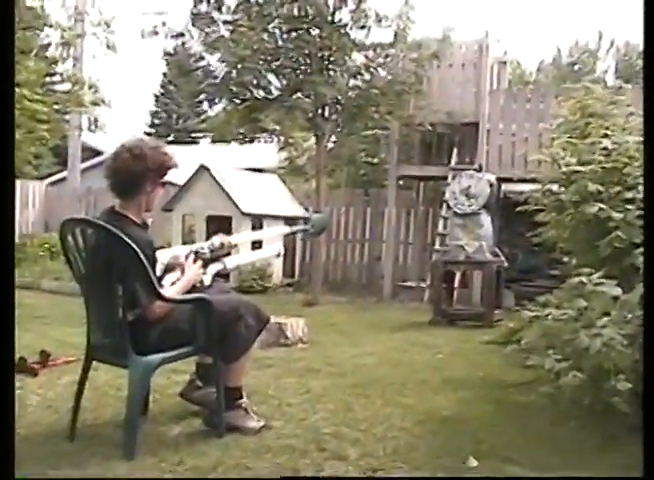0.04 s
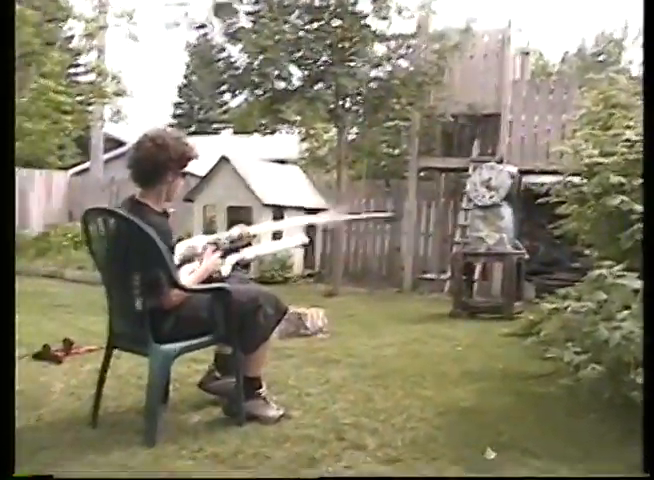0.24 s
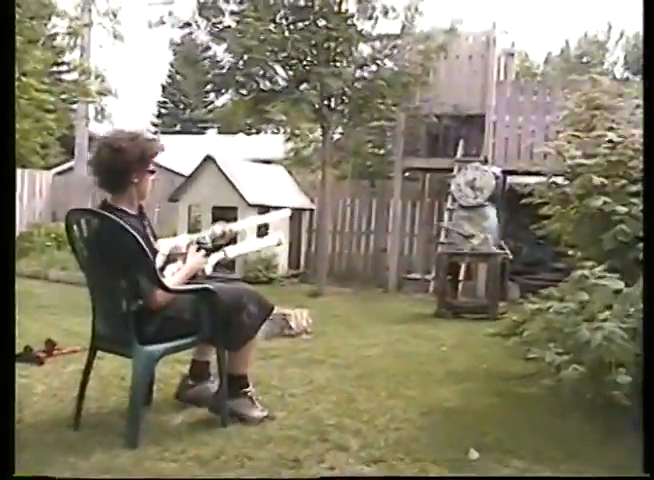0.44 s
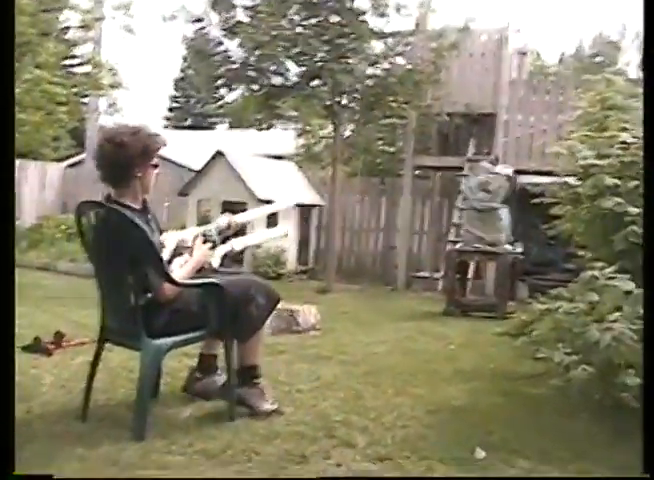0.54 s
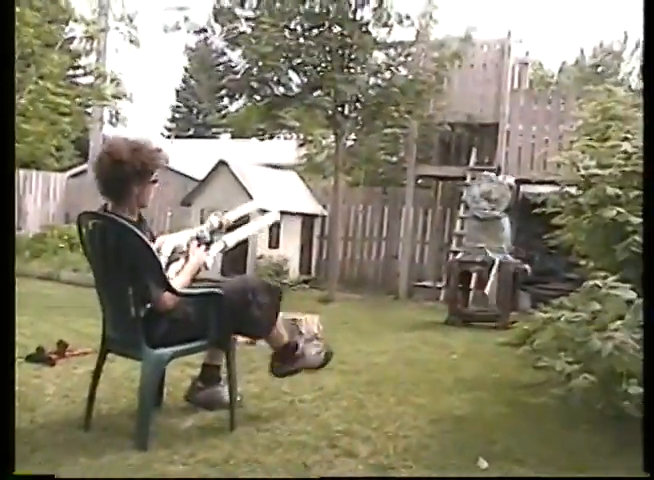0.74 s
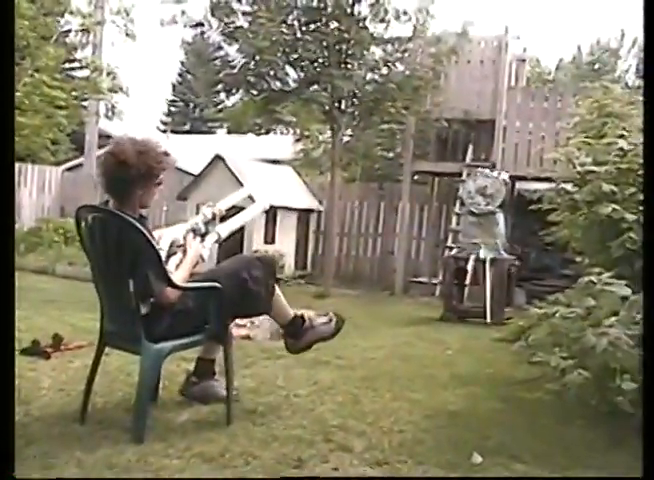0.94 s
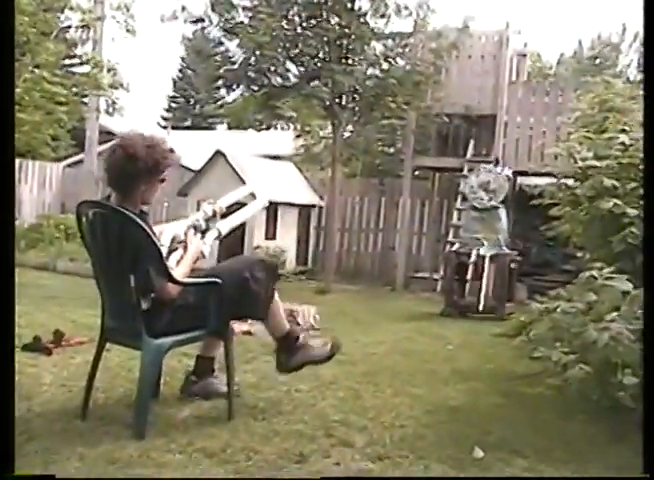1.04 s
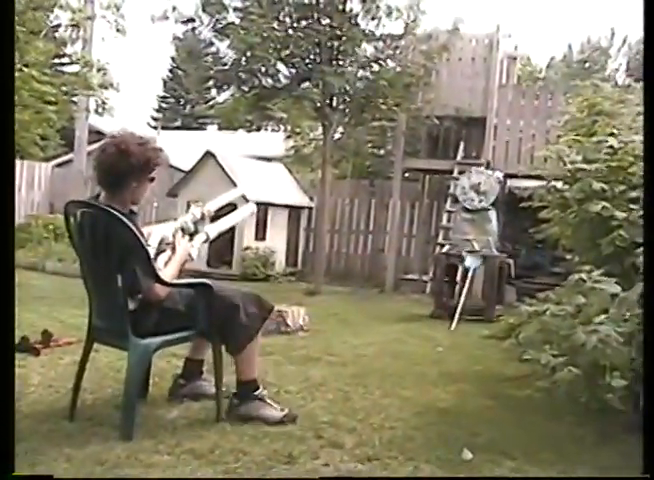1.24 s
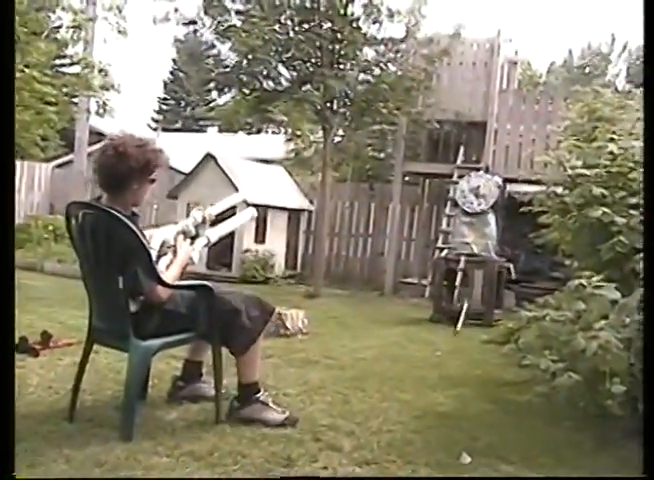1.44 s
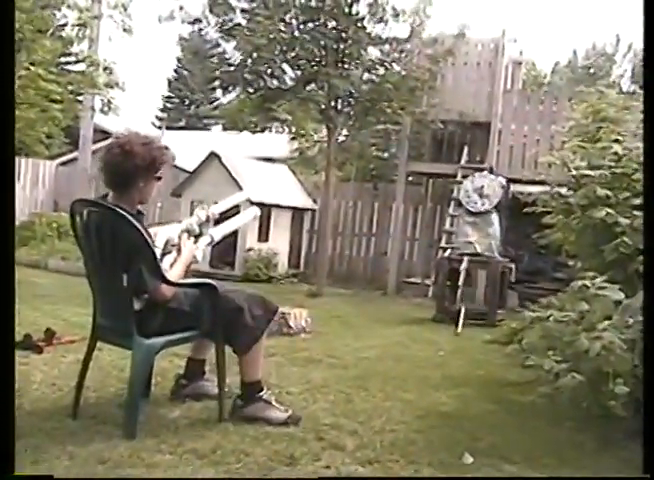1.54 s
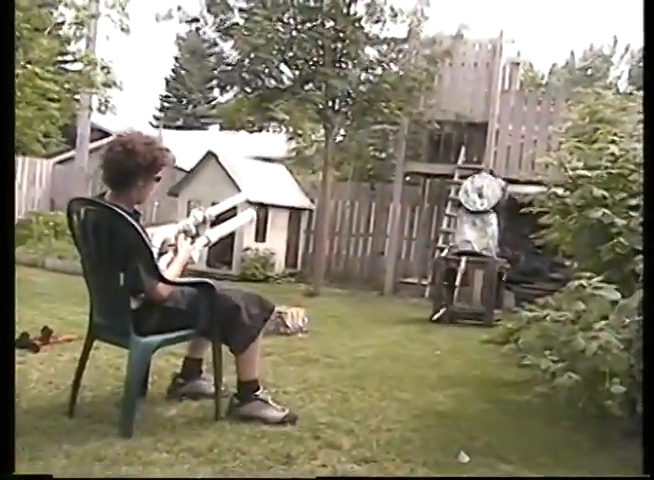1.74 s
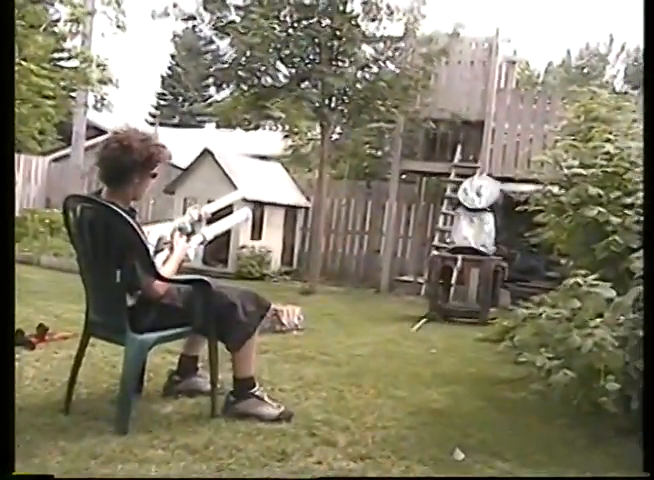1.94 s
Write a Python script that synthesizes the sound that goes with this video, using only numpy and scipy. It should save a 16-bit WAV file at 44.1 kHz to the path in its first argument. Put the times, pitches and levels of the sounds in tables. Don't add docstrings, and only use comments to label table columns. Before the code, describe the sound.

Compressed-air cannon fires with a click, pop and harsh rush, then slams into rattling sheet metal

```python
import sys
import numpy as np
from scipy import signal
from scipy.fft import rfft, irfft
from scipy.io import wavfile
from scipy.ndimage import uniform_filter1d

SR = 44100
rng = np.random.default_rng(int(sys.argv[2]) if len(sys.argv) > 2 else 0)


def amplitude_ratio(level_db):
    exponent = np.asarray(level_db, float) / 20
    return 10 ** exponent


def master_out(mix):
    frames = np.transpose(np.atleast_2d(mix))
    ceiling = np.clip(frames, -1, 1)
    pcm = np.round(ceiling * 32767).astype(np.int16)
    wavfile.write(sys.argv[1], SR, pcm)


N = 88200

LINE_HZ = 15734.2
# start_s, level_db
SHAKING = [(.558, -23), (.595, -16), (.645, -20), (.71, -27.5), (.79, -38), (.87, -45), (1.0, -42.5),
           (1.15, -48.5), (1.3, -50), (1.41, -65.5)]


def read(points, hz):
    table_hz, value = np.transpose(points)
    return np.interp(np.log(hz + 1), np.log(table_hz + 1), value)


def evened(x):
    return x / np.sqrt(np.mean(x ** 2) + 1e-20)


def colour(x, points):
    gain = amplitude_ratio(read(points, np.fft.rfftfreq(len(x), 1 / SR)))
    return evened(irfft(rfft(x) * gain, len(x)))


def band(x, hz, width):
    sharpness = max(hz / min(width, SR * .4), .2)
    return signal.lfilter(*signal.iirpeak(min(hz, SR * .45), sharpness, SR), x)


def lumpy(x, depth_db):
    spectrum = rfft(x)
    smoothing = max(int(40.1 * len(x) / SR), 2)
    lumps = evened(uniform_filter1d(rng.standard_normal(len(spectrum)), smoothing))
    return evened(irfft(spectrum * amplitude_ratio(depth_db * lumps), len(x)))


def level(curve):
    s, db = np.transpose(curve)
    t = np.arange(N) / SR
    db = np.interp(t, s, db) - 150 * np.maximum(t - s[-1], 0)
    return amplitude_ratio(db) * (t >= s[0]), db


def add(mix, s, sound):
    part = mix[round(s * SR):][:len(sound)]
    part += sound[:len(part)]


def ring(modes, upper_db=0, rise=0.00099, start=0):
    t = np.arange(SR) / SR
    upper_from_hz = modes[0][0] * 1.5
    out = np.zeros(SR)
    for hz, db, t60 in modes:
        fade = amplitude_ratio(db + upper_db * (hz > upper_from_hz) - 60 * t / t60)
        out += fade * np.sin(2 * np.pi * hz * (t + start))
    return (1 - np.exp(-t / rise)) * out


def choke(after_s):
    return np.maximum(np.arange(SR) / SR - after_s, 0)


def yard():
    # pitch_hz, level_db per Hz
    air = [(15, -59), (25, 4), (118, 1), (1980, -10), (3150, -17.5), (5420, -10), (8600, -18.5),
           (15200, -21), (16500, -46)]
    swell = amplitude_ratio(0.5 * evened(uniform_filter1d(rng.standard_normal(N), 4000)))
    return amplitude_ratio(-56.5) * swell * colour(rng.standard_normal(N), air)


def whine():
    return amplitude_ratio(-57.5) * np.sin(2 * np.pi * LINE_HZ * np.arange(N) / SR)


def idle():
    t = np.arange(N) / SR
    field_hz = 59.94
    buzz = sum(np.sinc(k / 24.0) * np.cos(2 * np.pi * k * field_hz * t) for k in range(1, 56))
    hiss = amplitude_ratio(-79) * rng.standard_normal(N)
    whistles = amplitude_ratio(-90) * np.sin(2 * np.pi * LINE_HZ * t) + amplitude_ratio(-86) * np.sin(2 * np.pi * 8000 * t)
    return hiss + amplitude_ratio(-83) * evened(buzz) + whistles


def knocks():
    # start_s, peak_db, pitch_hz, fade_s (time to fall 60
    # dB), width as a share of pitch
    knock_bursts = [(.1868, -10.5, 6230, 0.0068, 0.88), (.2375, -8.5, 6400, 0.044, 0.24),
                    (.5578, -5.5, 11600, 0.015, 2.2), (.666, -15, 6950, 0.033, 0.72),
                    (.7305, -17.5, 2530, 0.051, 0.67), (.835, -36.5, 7400, 0.051, 0.29),
                    (.843, -26, 1470, 0.098, 0.39), (.958, -36.5, 4600, 0.04, 0.5),
                    (.9815, -31, 8150, 0.024, 0.34), (.982, -29, 2180, 0.037, 0.53),
                    (1.009, -31, 4200, 0.027, 0.9), (1.0265, -30.5, 4040, 0.032, 1),
                    (1.078, -39, 5370, 0.021, 0.38), (1.13, -47, 5330, 0.15, 0.64),
                    (1.2185, -34, 1980, 0.037, 1.6), (1.276, -39.5, 5000, 0.089, 0.77),
                    (1.29, -36.5, 4570, 0.047, 1), (1.488, -44, 5830, .02, 0.28),
                    (1.5088, -24.5, 5050, 0.012, 1.1), (1.54, -36, 5130, 0.026, 0.43),
                    (1.7135, -26, 5100, 0.013, 0.37), (1.772, -39, 4930, 0.013, 0.44),
                    (1.8935, -26.5, 4100, 0.0087, 0.77), (1.9095, -35.5, 5530, 0.025, 0.33),
                    (1.93, -45, 1296, 0.23, 2.1), (1.972, -44.5, 6500, 0.034, 0.31),
                   (.1875, -22.5, 1830, 0.037, 1.04), (.899, -42, 5940, .05, 0.31),
                   (1.036, -43, 5200, 0.021, 0.39), (1.286, -46, 3120, 0.032, 0.13)]
    out, t = np.zeros(N), np.arange(6000) / SR
    for s, db, hz, t60, wide in knock_bursts:
        noise = rng.standard_normal(len(t))
        burst = evened(band(band(noise, hz, hz * wide), hz, 1.9 * hz * wide))
        add(out, s, 0.5 * burst * amplitude_ratio(db - 60 * t / t60) * np.minimum(t / 0.00092, 1))
    return out


def latch():
    # pitch_hz, level_db, fade_s (time to fall 60 dB)
    latch_tones = [(306, -35, 0.0091), (3250, -48, 0.44), (760, -33, 0.018)]
    out = np.zeros(N)
    add(out, .187, ring(latch_tones))
    return out


def pops():
    # start_s, pressure (negative sucks first), length_s
    pulses = [(0.2274, 0.22, 0.000045), (0.2331, -1.07, 0.00012), (0.2382, 0.19, 0.0011),
              (0.5580, 0.61, 0.00055), (0.5584, 0.3, 0.000015)]
    out = np.zeros(N)
    for s, size, length in pulses:
        u = np.arange(800) / SR / length
        add(out, s, size * 2.2 * u * (2 - u) * np.exp(-u))
    return out


def cannon():
    # start_s, level_db
    flow = [(0.228, -37), (0.235, -25), (0.239, -20), (0.3, -17), (0.426, -17.5), (0.55, -29.5)]
    # pitch_hz, level_db per Hz
    jet_spectrum = [(35, -20), (110, -4), (230, -16.5), (586, -16), (2520, -4.5), (2900, -7.5), (7080, -5),
                    (14700, -33), (16500, -76)]
    # pitch_hz, width_hz, level_db
    barrel = [(1884, 580, -10.5), (2594, 230, -11), (4980, 1950, -4), (6740, 1900, -13)]
    gain, db = level(flow)
    lost_db = db - db.max()
    age = np.maximum(np.arange(N) / SR - flow[2][0], 0)
    air, breath, rumble, spray = rng.standard_normal((4, N))

    whistles = sum(amplitude_ratio(g) * evened(band(band(breath, hz, w), hz, w)) for hz, w, g in barrel)
    jet = colour(lumpy(air, 3.5), jet_spectrum) + amplitude_ratio(0.36 * lost_db) * whistles
    low = signal.filtfilt(*signal.butter(2, 4000, fs=SR), jet)
    bass = signal.filtfilt(*signal.butter(2, 1400, fs=SR), jet)
    jet = low - bass + bass * amplitude_ratio(1.2 * lost_db) + (jet - low) * amplitude_ratio(lost_db)

    roar_db = -9.5 - 106 * np.maximum(age - 0.037, 0)
    roar = evened(band(rumble, 760, 760)) * amplitude_ratio(roar_db)
    fizz = evened(band(spray, 8850, 4200)) * amplitude_ratio(-6.5 - 102 * age)
    return gain * (0.77 * jet + roar + fizz)


def rings():
    # start_s, pitch_hz, level_db, fade_s (time to fall 60 dB), rise_s
    notes_of_parts = [(0.228, 4200, -23, .012, .0003), (0.2389, 975, -12, 0.023, .001),
                      (0.675, 8300, -25.5, 0.087, .003), (.668, 8100, -33, .08, .002),
                      (.668, 9200, -44, 0.13, .002), (.838, 960, -24.5, .05, 0.0019),
                      (0.843, 1476, -22, 0.022, .002), (.958, 853, -26.5, 0.027, 0.00091),
                      (0.981, 8370, -36.5, 0.071, .001), (.982, 7957, -42, 0.091, .001),
                      (.982, 10200, -47, 0.032, 0.0011), (0.984, 1042, -32, 0.058, 0.0025),
                      (1.025, 900, -32, 0.034, 0.0014), (1.04, 434, -38.5, 0.14, 0.0049),
                      (1.05, 240, -39, .3, 0.017), (1.075, 880, -43, 0.1, 0.0022),
                      (1.102, 402, -41, 0.18, .006), (1.14, 346, -48, .2, 0.0087),
                      (1.166, 850, -40.5, 0.074, 0.0027), (1.2175, 850, -31, 0.028, 0.0014),
                      (1.224, 337, -41, 0.14, 0.0068), (1.281, 870, -37.5, 0.058, .002),
                      (0.901, 1070, -38, 0.036, 0.0018), (1.01, 2010, -35.5, 0.025, .001),
                      (1.92, 893, -49, 0.12, .005), (1.955, 1010, -46.5, 0.11, 0.0054)]
    out = np.zeros(N)
    for s, hz, db, t60, rise in notes_of_parts:
        add(out, s, ring([(hz, db, t60)], rise=max(rise, 1e-4)))
    return out


def sheet():
    # pitch_hz, level_db per Hz
    hard_spectrum = [(60, -22), (130, -15), (584, -20.5), (1090, -13), (1390, -18), (1830, -16.5),
                     (6090, -23), (15000, -52), (16500, -66)]
    # pitch_hz, level_db per Hz
    soft_spectrum = [(65, -24), (300, -5.5), (600, -17), (880, -13.5), (1340, -15.5), (4060, -32.5),
                     (6430, -37), (16500, -77)]
    gain, db = level(SHAKING)
    rattles_per_s, spread_db = 2200, 3
    taps = amplitude_ratio(spread_db * np.minimum(rng.exponential(1, N), 5)) * (rng.random(N) < rattles_per_s / SR)
    tapping = evened(signal.lfilter([1], [1, -.985], taps))
    drive = lumpy(rng.standard_normal(N) * (1.8 + tapping), 1)
    hard_db, soft_db = -17, -51
    hard = np.clip((db - soft_db) / (hard_db - soft_db), 0, 1)
    return gain * (hard * colour(drive, hard_spectrum) + (1 - hard) * colour(drive, soft_spectrum))


def box():
    # pitch_hz, level_db, fade_s (time to fall 60 dB)
    box_tones = [(99, -4, .4), (132, 0, .45), (201, -11, .2), (245, -20, .25), (400, -22, .15)]
    # start_s, level_db, upper_tones_db, lowest_tone_db
    blows = [(0.563, -21, 1, 0), (.585, -14, 3, 4.5), (0.626, -15, -4, -8), (0.669, -19, -4, 7),
             (0.725, -25.5, 9.5, -16), (0.844, -28, 5.5, 0), (0.888, -34, 7, 1.5), (0.961, -37.5, 2, 2),
             (1.029, -40, 12, 4), (1.1, -36.5, 5, -46), (1.21, -42, 12, 0), (1.278, -42.5, 4, -2),
             (1.51, -48, 16, 1), (1.59, -29.5, 3, 2), (1.627, -29.5, 0.5, -2), (1.718, -40, 8.5, -13),
             (1.777, -48.5, 17, -1), (1.896, -43, 17, -4), (1.947, -46.5, 17, -32)]
    out = np.zeros(N)
    gaps = np.diff([row[0] for row in blows] + [N / SR])
    for (s, db, upper_db, low_db), gap in zip(blows, gaps):
        detune = 1 + .002 * rng.uniform(-0.86, 1, len(box_tones))
        modes = []
        for (hz, g, t60), shift in zip(box_tones, detune):
            modes.append((hz * shift, g + low_db * (hz == box_tones[0][0]), t60))
        add(out, s, amplitude_ratio(db - 2200 * choke(gap)) * ring(modes, upper_db, 0.0058, s))

    noise, rumble = rng.standard_normal(N), np.zeros(N)
    for hz, db, _ in box_tones:
        narrow = band(noise, hz, 14 * hz / 100)
        rumble += amplitude_ratio(db / 2) * evened(band(narrow, hz, hz / 2))
    shaking = uniform_filter1d(level(SHAKING)[0], 800, origin=399)
    return out + amplitude_ratio(-13) * shaking * rumble


def rod():
    # start_s, low_tone_db, middle_pair_db, top_tone_db, free_s (time until damped)
    hits = [(.672, -52, -48, -42, .16), (.735, -46, -60, -58, .045), (.982, -51, -58, -70, .04),
            (1.03, -51, -60, -66, .105), (1.078, -70, -59, -75, .055), (1.219, -54, -64, -75, .06)]
    rod_hz = [2789, 6519, 7100, 8280]
    rod_fade = [1.1, .3, .25, .3]
    out = np.zeros(N)
    for s, low_db, mid_db, top_db, free in hits:
        modes = list(zip(rod_hz, [low_db, mid_db, mid_db, top_db], rod_fade))
        add(out, s, ring(modes) * amplitude_ratio(-1500 * choke(free)))
    return out


def drop():
    # pitch_hz, level_db per Hz
    crack_spectrum = [(150, -54), (250, -14.5), (741, -6), (1780, -9.5), (3410, -8), (4130, -14.5),
                      (4750, -7.5), (8330, -18.5), (16500, -56)]
    pipe_hz = [420, 487, 749, 2280, 2525, 2778, 3364, 4355]
    # level_db, fade_s (time to fall 60 dB)
    pipe = [(-29, .1), (-27, .1), (-21, .075), (-27, .11), (-22, .13), (-38, .22), (-21, .12), (-29, .08)]
    t, out = np.arange(SR // 2) / SR, np.zeros(N)
    land_s, land_db = 1.5722, -18
    crack = colour(rng.standard_normal(len(t)), crack_spectrum)
    clatter = colour(rng.standard_normal(len(t)), crack_spectrum)
    clatter = evened(signal.lfilter(*signal.butter(1, 2410, fs=SR), clatter))
    landing = crack * amplitude_ratio(land_db - 60 * t / 0.09) + clatter * amplitude_ratio(-38 - 60 * t / 0.65)
    add(out, land_s, np.minimum(t / 0.00013, 1) * landing)
    add(out, land_s + .023, clatter * amplitude_ratio(land_db - 6 - 60 * t / 0.14))
    add(out, land_s, ring([(hz, *rest) for hz, rest in zip(pipe_hz, pipe)]))
    return out


def chime():
    chime_hz = [904, 1028, 1292]
    # level_db, fade_s (time to fall 60 dB)
    chime_tones = [(-45, .8), (-40.5, .6), (-31, .55)]
    out = np.zeros(N)
    add(out, 1.65, ring([(hz, *rest) for hz, rest in zip(chime_hz, chime_tones)], rise=.02))
    return out


def fences(x):
    t = np.arange(SR // 2) / SR
    tail = rng.standard_normal(len(t)) * amplitude_ratio(-60 * t / 0.35) * (t > .008)
    tail = band(tail, 1630, 3600)
    return amplitude_ratio(-13.5) * signal.fftconvolve(x, tail / np.linalg.norm(tail))[:N]


def scene():
    struck = knocks() + rod() + box()
    no_deep_bass = signal.butter(4, 77, "high", fs=SR, output="sos")
    struck = signal.sosfilt(no_deep_bass, struck)
    hits = struck + rings() + drop() + chime() + pops() / 2
    left = 2 * (yard() + whine() + latch() + cannon() + sheet() + hits + fences(hits))
    return np.array([left, idle()])


def low_pass(x):
    return signal.sosfilt(signal.butter(12, 16810, fs=SR, output="sos"), x)


def record(dry):
    x = signal.lfilter(*signal.butter(2, 10740, fs=SR), dry)
    knee = np.where(x < 0, .54, 1.0)
    x = x / (1 + np.abs(x / knee) ** 5) ** (1 / 5)
    x = signal.sosfilt(signal.ellip(8, 1, 50, 15900, fs=SR, output="sos"), x)
    return low_pass(x)


dry = scene()
out = record(dry)
master_out(out)
```